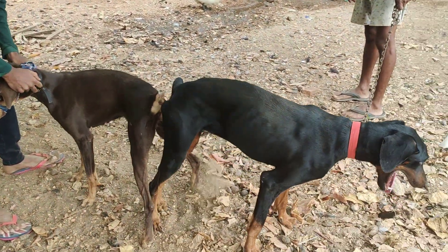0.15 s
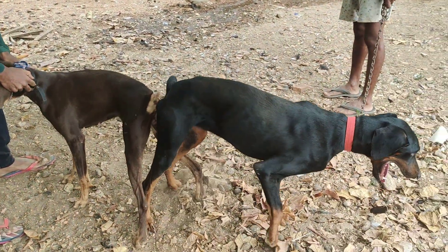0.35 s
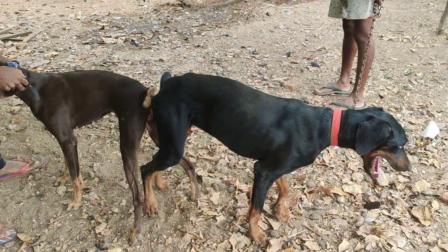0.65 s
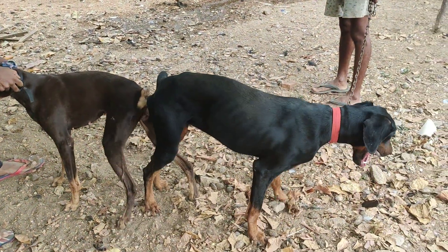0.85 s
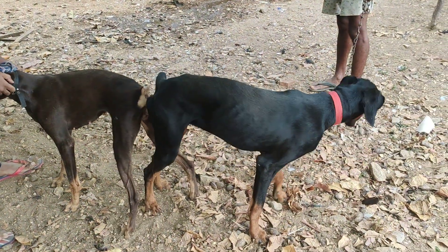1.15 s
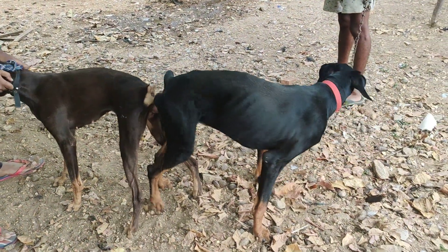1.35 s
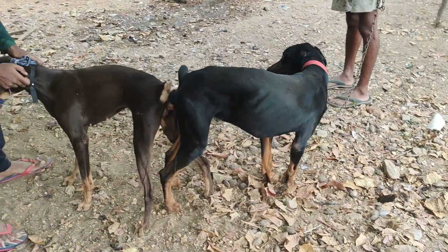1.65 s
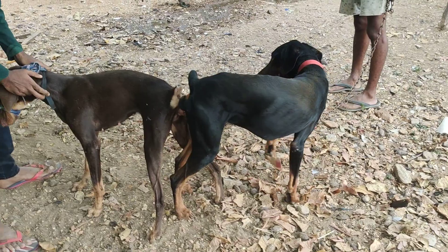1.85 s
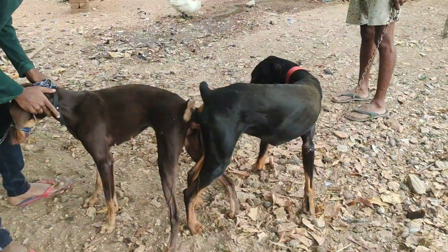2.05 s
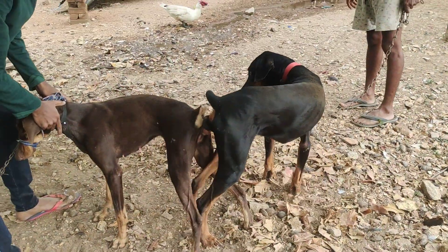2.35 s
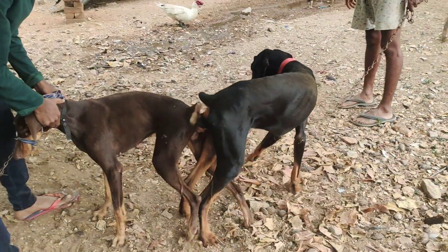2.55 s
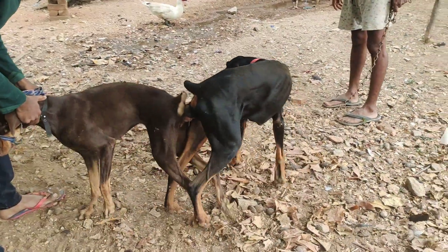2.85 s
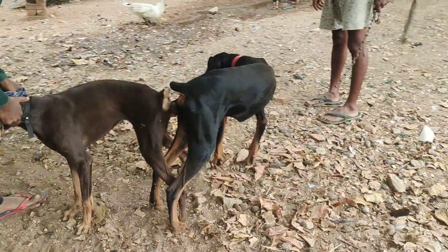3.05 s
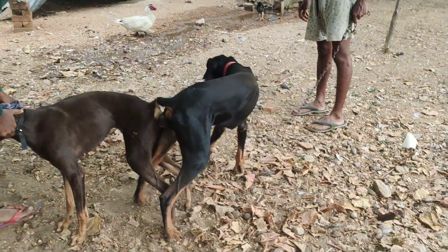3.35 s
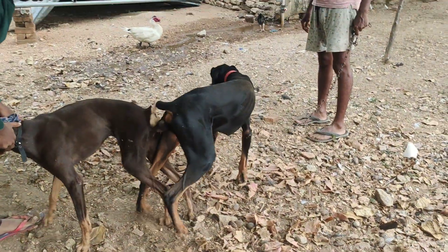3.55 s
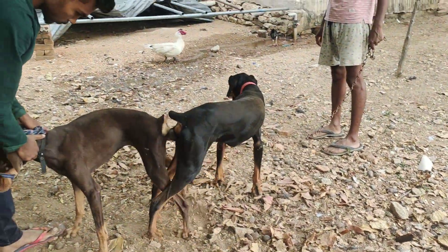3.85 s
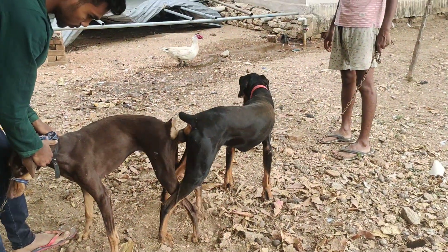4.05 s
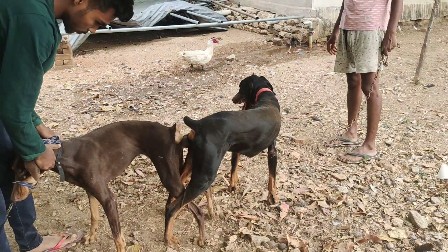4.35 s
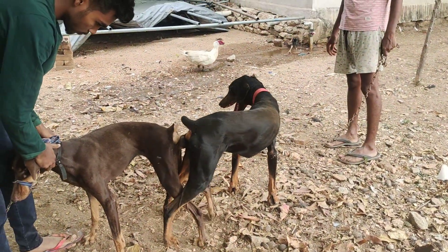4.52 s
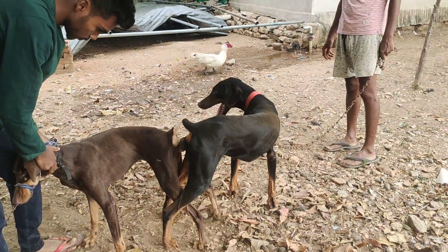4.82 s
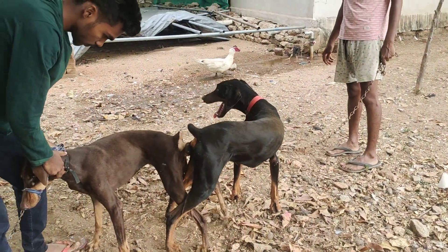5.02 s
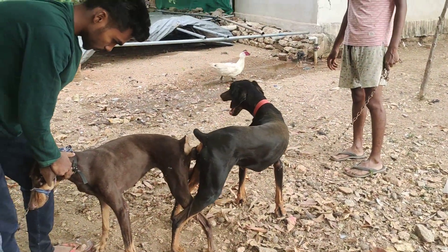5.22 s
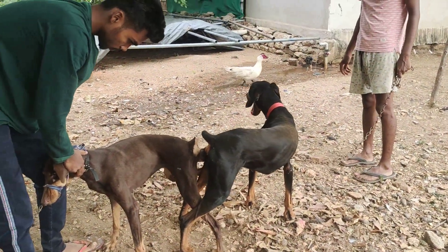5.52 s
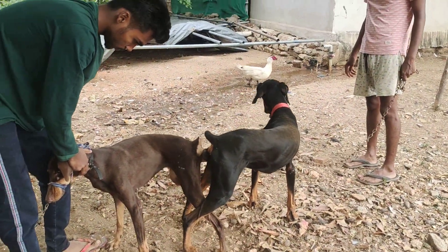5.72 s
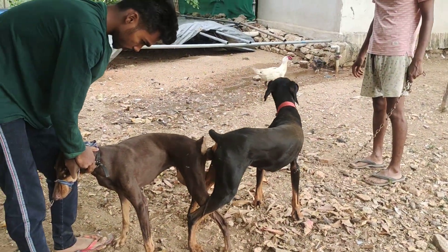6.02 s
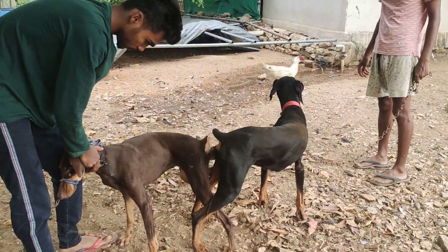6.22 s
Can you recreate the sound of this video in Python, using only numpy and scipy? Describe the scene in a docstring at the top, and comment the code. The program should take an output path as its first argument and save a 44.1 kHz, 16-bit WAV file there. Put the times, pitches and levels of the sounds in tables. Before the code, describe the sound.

Paws scuff and crunch softly in dry leaves close by from the start, with small stem snaps and dull steps on earth. At about 0.9 and 1.2 seconds a dog, slightly to the left, gives two short, sharp yelps that rise and then drop in pitch. They are much louder than everything else, and the yard walls return a quick echo. The leaf rustling continues unevenly, with crisper crunches around 2.3 and 4.4 seconds, then thins out. Chain links tick lightly between 4.1 and 5.7 seconds. The dog yelps three more times, a little softer, at about 5.1, 5.8 and 6.3 seconds, with another brief crunch at 6 seconds. Small birds give faint, high, rising chirps near 0.4, 3.6, 5.1 and 6.3 seconds, with a few fainter notes between. A quiet, low, distant hum lies underneath throughout.

```python
"""A dog off to the left yelps five times in a walled yard, and the walls throw each yelp back.
Its vocal folds give a gliding harmonic series, which the resonances of throat and mouth filter.
Close by, paws scuff and crunch dry leaves (noise from many small fractures), thud on earth and snap
stems, and chain links tick as they collide. Small birds chirp in near-sine glides over a low distant hum."""
import sys
import numpy as np
from scipy import signal
from scipy.fft import rfft, irfft, next_fast_len
from scipy.io import wavfile
from scipy.ndimage import uniform_filter1d

SR = 44100
rng = np.random.default_rng(int(sys.argv[2]) if len(sys.argv) > 2 else 0)


def wav_out(sig):
    """Save sig, one row per channel (or a flat mono array), as 16-bit PCM at SR to the path in sys.argv[1]."""
    wavfile.write(sys.argv[1], SR, np.round(np.clip(np.atleast_2d(sig).T, -1, 1) * 32767).astype(np.int16))


N = 281358

# treble spectrum of cracking leaves: f/Hz, level/dB
FIZZ_SPECTRUM = [(2500, -3), (4000, -0.5), (5500, -6.5), (6900, 4), (9000, -2), (11500, -6), (13700, 2.5),
                 (15800, -9.5)]


def dog():
    """Reflection: the direct yelps, a delayed copy from each wall, and a diffuse tail."""
    # yelps: t/s of start, mouth opening, crest and voice break; glide time/s, glide exponent,
    # start f/Hz, top f/Hz, fundamental level/dB, overtone level/dB, roughness
    yelps = [(0.891, 0.919, .985, 1.008, .095, 0.94, 355, 534.8, -14, -34.5, 0.42),
             (1.212, 1.234, 1.296, 1.32, 0.093, .9, 401.6, 527.3, -14.5, -35, 0.34),
             (5.132, 5.145, 5.198, 5.21, 0.072, 1.9, 548, 543.4, -17.5, -34.5, 0.13),
             (5.787, 5.816, 5.868, 5.906, 0.073, 1.5, 337.6, 517, -22.5, -33, 0.43),
             (6.268, 6.302, 6.357, 6.41, 0.079, 1.42, 354, 521, -19, -34, .33)]
    # wall echoes: delay/s, level/dB, right-channel lag/ms
    echoes = [(.012, -14.5, 0.19), (.036, -27, 0.15), (.079, -12, 0.31), (.108, -16.5, 0.31),
              (.136, -22.5, 0.45), (.162, -25.5, .22), (.188, -26.5, 0.5), (.208, -28.5, 0.27)]
    voice = np.zeros(N)
    for row in yelps:
        add(voice, row[0], yelp(*gesture(*row)))
    voice *= signal.windows.tukey(N, .0015)
    # rough walls scatter the treble most
    scattered = shaped(voice, lambda f: gain_of(-7) / (1 + (800 / (f + 1)) ** 2))
    left, right = reverberation(scattered, likeness=1.6)
    out = np.array([voice + left, delayed(voice + right, ms=.3)])
    for delay, db, lag_ms in echoes:
        add(out, delay, gain_of(db) * np.array([voice, delayed(voice, lag_ms)]))
    return out


def gesture(start, opens, crest, breaks, glide, bend, start_hz, top_hz, first_db, over_db, rough):
    """Vocal modulation: pitch glides, holds and sags at the break, while effort swells and fades."""
    break_s, tail_s, sag_hz, sag_hz_per_s = .008, .0437, 197, 5620
    swell, ease, shut, fall = 268, 29, 400, 438  # dB/s
    t = np.arange(start, breaks + tail_s, 1 / SR)
    before, after = np.maximum(crest - t, 0), np.maximum(t - crest, 0)
    since_break = break_s * np.log1p(np.exp((t - breaks) / break_s))
    tail = since_break / tail_s
    hz = start_hz + (top_hz - start_hz) * np.sin(np.pi / 2 * np.minimum((t - start) / glide, 1)) ** bend
    hz -= sag_hz * np.tanh(sag_hz_per_s * since_break / sag_hz)
    edge_loss = 16 * np.exp((start - t) / .0073) + fall * since_break
    effort_loss = np.where(t < crest, 3, 6) * (1 - np.exp(-((t - crest) / .015) ** 2))  # rounded crest
    effort_loss += swell * before + ease * after
    closed = 1 / (1 + np.exp((t - opens) / .003))  # the mouth snaps open
    mouth_loss = 10 * closed + shut * after
    strain = .56 + .44 * np.exp(-((t - crest) / .03) ** 2)
    rough = rough * strain + .3 * tail
    return hz, first_db - effort_loss - edge_loss, over_db - mouth_loss - edge_loss, rough, closed, tail


def yelp(hz, first_db, over_db, rough, closed, tail):
    """Source and filter: overtones and air puffs pass the throat, above a fundamental and breath."""
    # response of throat and mouth: f/Hz, level/dB
    throat = [(500, -16), (850, 8), (980, -0.5), (1090, 2.5), (1250, 1.5), (1400, -5), (1600, 3),
              (1830, -9.5), (2030, -5.5), (2280, -12.5), (2520, -15.5), (3100, -21), (3800, -26.5),
              (5500, -31.5)]
    size = len(hz)
    cycles = np.cumsum(hz) / SR
    jittered = cycles + .065 * rough * wander(size, 3)  # uneven cycles blur the high partials most
    muffle = np.clip(np.maximum((-35 - first_db) / 9, .37 * closed), 0, 1)  # low effort narrows the mouth
    soft = np.clip(1 - rough / .18, 0, 1)  # an unforced voice has few partials above the third
    folds = 0
    for k in range(2, 12):
        loss_db = 7 * muffle * (k - 2) + 11 * soft * max(k - 3, 0)
        folds += np.cos(2 * np.pi * k * jittered) * gain_of(6.8 * rough * wander(size, 2.4) - loss_db)
    puffs = 1.3 * rough * (1 - muffle) * (.2 + np.exp(-(cycles % 1) / .2)) * rng.standard_normal(size)
    overtones = shaped(gain_of(over_db) * (folds + puffs), lambda f: gain_of(read(throat, f)) * (f > 420))
    wobble_db = 3 * np.minimum(tail, 1) * wander(size, 2.5)
    fundamental = np.sin(2 * np.pi * cycles) * gain_of(wobble_db)
    air = rng.standard_normal(size)
    breath = unit_rms(shaped(air, lambda f: 1 / (1 + (5000 / (f + 1)) ** 4) / (1 + (f / 11000) ** 4)))
    voice = gain_of(first_db) * (fundamental + gain_of(-38) * breath) + overtones
    return voice * signal.windows.tukey(size, .08)


def reverberation(x, likeness):
    """Diffuse field: sparse reflections of random sign, each band decaying at its own rate."""
    # reverberation time of the yard: f/Hz, T60/s
    decay_times = [(300, 0.41), (520, 0.67), (1000, 0.41), (2000, 0.33), (5000, 0.29), (12000, 0.033)]
    taps = np.zeros((2, SR // 2))
    arrivals = np.arange(300, SR // 2 - 20, 20) + rng.integers(0, 20, (2, (SR // 2 - 301) // 20))
    np.put_along_axis(taps, arrivals, rng.choice([-1., 1.], arrivals.shape), 1)
    hz, t, bands = signal.stft(correlated(*taps, likeness), SR, nperseg=256)
    tail = signal.istft(bands * gain_of(-60 * t / read(decay_times, hz)[:, None]), SR, nperseg=256)[1]
    return signal.fftconvolve(x[None], tail / np.linalg.norm(tail[0]), axes=1)[:, :N]


def leaves():
    """Incoherent addition: scuffs and soft stirring sum in power, in three bands of grainy hiss."""
    # paw scuffs: loudest t/s, 20 dB rise time/s, 20 dB fall time/s, level/dB of earth, body and fizz
    scuffs = [(0.038, 0.013, 0.13, -53.5, -45.5, -57), (.19, 0.052, 0.26, -79, -62, -53.5),
              (.33, .02, 0.32, -60, -53.5, -46), (.508, .02, 0.06, -59, -45.5, -70),
              (.59, 0.11, 0.13, -72, -56, -52), (.778, 0.017, 0.089, -73, -58.5, -55),
              (1.0, 0.15, 0.12, -55, -43, -48), (1.49, 0.065, .2, -57.5, -52, -53),
              (1.64, 0.25, .2, -69, -51, -59), (1.7, 0.22, .1, -70, -73, -55.5),
              (1.835, 0.057, 0.088, -53.5, -45.5, -51.5), (2.05, .05, 0.066, -55.5, -42, -55),
              (2.1, 0.088, 0.77, -59.5, -54, -59.5), (2.33, 0.062, 0.076, -55, -43.5, -43.5),
              (2.39, 0.054, 0.34, -67, -54, -55.5), (2.49, 0.17, 0.053, -62, -63, -49.5),
              (2.67, .09, 0.082, -65, -57, -65), (2.79, 0.22, 0.085, -73, -58.5, -59),
              (3.015, 0.13, 0.072, -61, -48.5, -52.5), (3.12, 0.1, 0.12, -56.5, -53.5, -52.5),
              (3.345, 0.39, 0.099, -68, -57.5, -56.5), (3.47, 0.14, 0.097, -60, -58.5, -56),
              (3.64, 0.11, .15, -82, -61.5, -64), (3.79, 0.15, 0.016, -59, -60, -73),
              (3.96, 0.14, 0.086, -62, -57.5, -56.5), (4.09, 0.25, 0.43, -66, -67, -61),
              (4.244, 0.062, 0.017, -56, -52.5, -51.5), (4.28, .05, 0.071, -73, -57, -55),
              (4.33, 0.093, .04, -57, -54.5, -57), (4.4, 0.044, 0.081, -50.5, -50.5, -52),
              (4.62, .06, 0.33, -79, -67, -63.5), (4.85, 0.43, 0.055, -68, -61.5, -74),
              (6.054, 0.036, 0.093, -57, -51, -58)]
    # stirring between scuffs: t/s, level/dB of earth, body and fizz
    stirring = [(0, -65, -62.5, -64), (.45, -70, -58, -57), (.9, -71, -64.5, -76), (1.2, -60, -66, -66.5),
                (1.45, -59, -62, -68), (1.95, -70.5, -59, -70), (2.6, -77, -64.5, -61.5),
                (2.92, -63.5, -59.5, -69), (3.7, -70, -66, -66), (4.5, -72, -59.5, -75),
                (4.7, -74, -71.5, -68), (5.1, -67, -62, -70), (5.6, -67.5, -64, -72),
                (5.97, -62.5, -56, -57), (6.18, -60, -64, -70), (6.38, -74, -54, -65)]
    # spectra of scraped earth and of the leaf body: f/Hz, level/dB
    earth = [(150, -24), (300, -6), (500, 2.5), (800, 5), (1300, 1.5), (1800, -9), (3000, -58)]
    body = [(600, -51), (1300, -10), (1900, -5), (2450, -1.5), (2750, -5), (3000, -6), (4500, -9.5),
            (6000, -16.5), (8000, -19.5)]
    t = np.arange(N) / SR
    times, *stir_db = np.transpose(stirring)
    power = gain_of([np.interp(t, times, db) for db in stir_db]) ** 2
    for loudest, rise, fall, *db in scuffs:
        envelope = gain_of(-20 * np.maximum((loudest - t) / rise, (t - loudest) / fall))
        power += np.outer(gain_of(db), envelope) ** 2
    snaps_per_s = 260
    snaps = (rng.random((3, N)) < snaps_per_s / SR) * gain_of(4.1 * rng.exponential(1, (3, N)).clip(0, 5))
    snaps[::2] += .7 * snaps[1]  # many snaps sound in all bands at once
    bands = [(earth, 1.4), (body, 1.6), (FIZZ_SPECTRUM, 5)]
    out = 0
    for clicks, level, (spectrum, likeness) in zip(snaps, np.sqrt(power), bands):
        grain = 1.43 + .35 * unit_rms(signal.lfilter([1], [1, -.96], clicks))  # a snap lifts the hiss
        hiss = correlated(*grain * rng.standard_normal((2, N)), likeness)
        out += level * coloured(hiss, spectrum)
    return patchy(out, db=2.86, frames=9, bins=3)


def patchy(x, db, frames, bins):
    """Random spectral modulation: the colour changes from leaf to leaf."""
    bands = signal.stft(x, nperseg=256)[2]
    patches = uniform_filter1d(rng.standard_normal(bands.shape[-2:]), bins, axis=0)
    patches = unit_rms(uniform_filter1d(patches, frames, axis=1))
    return signal.istft(bands * gain_of(db * patches), nperseg=256)[1][..., :N]


def steps():
    """Noise-driven resonance: dying bursts make a leaf crunch or the ground thud."""
    # leaf crunches and paw falls on earth: t/s, level/dB, resonance f/Hz, T60/s
    crunches = [(0.033, -48, 2750, 0.071), (0.0544, -43, 2580, 0.03), (0.0846, -50.5, 2770, 0.038),
                (0.3203, -45.5, 3060, 0.15), (0.5032, -44, 2310, 0.059), (.5645, -52, 2150, .04),
                (.771, -54, 2880, 0.066), (1.661, -49, 2610, .045), (1.8097, -45.5, 3960, 0.22),
                (1.923, -49.5, 3300, 0.043), (2.016, -45.5, 2540, 0.11), (2.1817, -48.5, 2570, 0.06),
                (2.2977, -54, 2560, .062), (2.342, -41.5, 2680, 0.037), (2.6642, -50, 2400, 0.055),
                (3.345, -47, 2290, 0.091), (4.2352, -46, 2580, 0.021), (4.2792, -48.5, 6850, .045),
                (4.3879, -40.5, 2060, 0.21), (4.4218, -51, 2450, .045), (4.8344, -56.5, 2030, 0.073),
                (6.0004, -50, 2060, 0.047), (6.057, -43.5, 3070, .067)]
    thuds = [(.049, -51, 466, 0.29), (.321, -51, 546, 0.086), (.504, -51, 861, 0.072),
             (2.096, -43, 745, 0.042), (2.794, -50, 480, 0.11), (2.897, -50, 844, 0.13),
             (2.935, -48.5, 438, 0.12), (4.391, -47.5, 990, 0.14), (5.017, -44.5, 301, 0.034)]
    leaf_q = 1.52
    out, t = np.zeros((2, N)), np.arange(6000) / SR
    for start, db, hz, t60 in crunches:
        cracks = rng.standard_normal((2, len(t)))
        cracks *= gain_of(4 * wander(len(t), 1.2) + 6 * np.exp(-t / .003))  # the first crack is sharpest
        cracks[1] = .12 * cracks[0] + .75 * cracks[1]
        body = unit_rms(resonance(resonance(cracks, hz, hz / leaf_q), hz, .73 * hz / leaf_q))
        fizz = gain_of(-14) * coloured(cracks, FIZZ_SPECTRUM)
        add(out, start, gain_of(db - 60 * t / t60) * np.minimum(t / .00056, 1) * (body + fizz))
    for start, db, hz, t60 in thuds:
        knock = unit_rms(resonance(resonance(rng.standard_normal(len(t)), hz, 160), hz, 630))
        add(out, start, gain_of(db - 60 * t / t60) * np.minimum(t / .00084, 1) * knock)
    return out


def stems():
    """Brittle fracture: each stem breaks with a dry click in two broad bands."""
    # breaking stems: t/s, upper-band level/dB, lower band relative to upper/dB
    snaps = [(0.0552, -44.5, 5), (0.077, -45, 5), (0.3266, -43, -4), (0.5645, -43.5, 1), (1.494, -52.5, -7),
             (1.804, -54, -12), (1.8295, -46.5, 8), (2.297, -42, 5), (2.343, -38, 4), (2.5708, -40.5, -12),
             (3.016, -40, -14), (3.632, -46, -1.1), (3.9399, -50.5, -5), (4.2368, -54, -13),
             (4.2757, -44, -8), (4.3874, -57, -3), (4.4218, -45, -4), (4.6114, -49, -1),
             (4.7654, -44.5, -22), (4.831, -50, -16), (5.9466, -45, -16)]
    out, t, t60 = np.zeros((2, N)), np.arange(400) / SR, .01
    for start, db, lower_db in snaps:
        crack = rng.standard_normal((2, len(t)))
        upper = unit_rms(resonance(crack, 13000, 8400))
        lower = gain_of(lower_db) * unit_rms(resonance(crack, 5700, 2800))
        add(out, start, gain_of(db - 60 * t / t60) * (upper + lower))
    return out


def chain():
    """Free vibration: links tap each other and ring in two damped modes."""
    # impacts of links: t/s, level/dB
    ticks = [(4.0963, -47), (4.5625, -51), (5.0509, -53), (5.4311, -50), (5.451, -47), (5.541, -55),
             (5.59, -48.5), (5.6266, -49), (5.669, -49)]
    # modes of a link: f/Hz, T60/s, level/dB
    modes = [(2930, 0.032, -2.5), (3970, 0.016, -9)]
    out, t = np.zeros(N), np.arange(2000) / SR
    ring = sum(gain_of(db - 60 * t / t60) * np.sin(2 * np.pi * hz * t) for hz, t60, db in modes)
    for start, db in ticks:
        add(out, start, gain_of(db) * ring)
    return out * gain_of([[.5], [-3]])


def birds():
    """Frequency and amplitude modulation: fluttering rising chirps and faint notes of other birds."""
    # chirps: t/s, length/s, start f/Hz, top f/Hz, glide exponent, level/dB, level change/dB
    chirps = [(0.356, 0.17, 4350, 6230, 1.1, -38, -8.5), (3.632, .165, 4140, 6020, 0.9, -38.5, -6),
              (5.14, .178, 3780, 5880, .9, -41.5, 3), (6.25, 0.19, 3530, 5980, .8, -41.5, 0)]
    # contour of every chirp: share of length, share of glide, level/dB
    contour = [(0, 0, -5), (0.128, .28, 1), (.3, .47, -2), (.6, .61, -3), (0.751, .83, -3.5),
               (.85, .95, -7.5), (1, 0.82, -18)]
    # one curve a faint note: t/s, f/Hz, level/dB, relative octave level/dB, waver depth
    note_curves = [
        [(.615, 459, -54.5, -25, 0.72), (.685, 537, -63, -20, 0.64)],
        [(1.53, 1158, -59, -32, .5), (1.585, 1262, -52.5, -30, .5)],
        [(1.666, 3870, -42, -16, 0.93), (1.72, 3925, -46, -16, 0.53), (1.775, 3685, -61, -24, 0.56)],
        [(4.508, 983, -61, -46.5, 1.3), (4.57, 950, -59, -32, 1.65), (4.65, 858, -65.5, -30, 1.1)],
        [(5.284, 3650, -57, -34, 0.17), (5.335, 2640, -51.5, -30, 0.55), (5.365, 1943, -50.5, -28, 0.64),
         (5.39, 1820, -57, -62, 0.6)],
    ]
    song, notes = np.zeros(N), np.zeros(N)
    for start, length, start_hz, top_hz, bend, level_db, change_db in chirps:
        hz, db = curves([(start + length * u, start_hz + (top_hz - start_hz) * up ** bend,
                          level_db + db + change_db * u) for u, up, db in contour])
        size = len(hz)
        cycles = np.cumsum(hz * (1 + .005 * wander(size, 2.2))) / SR
        db += 3 * wander(size, 1.6)
        add(song, start, gain_of(db) * np.sin(2 * np.pi * cycles) * signal.windows.tukey(size, .1))
    for rows in note_curves:
        hz, db, octave_db, waver = curves(rows)
        start, size = rows[0][0], len(hz)
        cycles = np.cumsum(hz * (1 + .028 * waver * wander(size, 2.4))) / SR
        tone = np.sin(2 * np.pi * cycles) + gain_of(octave_db) * np.sin(4 * np.pi * cycles)
        db += 4.1 * waver * wander(size, 3.9)
        add(notes, start, gain_of(db) * tone * signal.windows.tukey(size, .25))
    direct = song + notes
    diffuse = reverberation(gain_of(-11) * song + gain_of(-10) * notes, likeness=.4)
    return np.array([direct, delayed(direct, ms=.11)]) + diffuse


def hum():
    """Ambient noise: distant rumble and air, drifting slowly in level."""
    # background spectrum: f/Hz, relative level/dB
    spectrum = [(18, -61), (30, -18), (90, 0.5), (141, 3.5), (352, -8), (903, -16.5), (1880, -19.5),
                (2440, -16), (2640, -63), (2940, -10), (3260, -37), (5220, -25), (13400, -37), (15700, -42)]
    level_db = -58 + .9 * wander(N, 120)
    air = correlated(*rng.standard_normal((2, N)), likeness=1)
    return gain_of(level_db) * coloured(air, spectrum)


def correlated(left, other, likeness):
    """Partial coherence: the right channel shares part of the left, most of all in the bass."""
    # coherence before scaling by likeness: f/Hz, coefficient
    coherence = [(60, 0.9), (200, 0.94), (600, 0.48), (1200, 0.07), (2500, 0.051), (4000, 0.011),
                 (15000, 0.017)]
    share = lambda f: np.clip(likeness * read(coherence, f), 0, 1)
    return np.array([left, shaped(left, share) + shaped(other, lambda f: np.sqrt(1 - share(f) ** 2))])


def shaped(x, response):
    """Linear filtering: multiplies the spectrum by a frequency response."""
    size = next_fast_len(x.shape[-1] + 2048)
    return irfft(rfft(x, size) * response(np.fft.rfftfreq(size, 1 / SR)), size)[..., :x.shape[-1]]


def coloured(x, spectrum):
    """Spectral weighting by a table of f/Hz, level/dB, scaled to rms 1."""
    return unit_rms(shaped(x, lambda f: gain_of(read(spectrum, f))))


def resonance(x, hz, width_hz):
    """Second-order resonance of peak gain 1."""
    return shaped(x, lambda f: 1 / (1 + 1j * (f - hz ** 2 / (f + 1)) / width_hz))


def delayed(x, ms):
    """Delay as a linear phase shift."""
    return shaped(x, lambda f: np.exp(-2j * np.pi * f * ms / 1000))


def wander(size, ms):
    """Low-pass noise of rms 1, smoothed over ms."""
    width = max(round(ms * SR / 1000), 1)
    return unit_rms(uniform_filter1d(uniform_filter1d(rng.standard_normal(size), width), width))


def read(points, hz):
    """Linear interpolation over log frequency."""
    f, value = np.transpose(points)
    return np.interp(np.log(hz + 1), np.log(f + 1), value)


def curves(rows):
    """Linear interpolation over time: the columns after t/s at every sample."""
    times, *columns = np.transpose(rows)
    t = np.arange(times[0], times[-1], 1 / SR)
    return [np.interp(t, times, column) for column in columns]


def add(mix, start, sound):
    """Superposes a sound at start seconds."""
    part = mix[..., round(start * SR):][..., :sound.shape[-1]]
    part += sound[..., :part.shape[-1]]


def gain_of(db):
    """Level to amplitude ratio."""
    return 10 ** (np.asarray(db) / 20)


def unit_rms(x):
    """Normalises to rms 1."""
    return x / np.sqrt(np.mean(x ** 2) + 1e-20)


def scene():
    """Superposition of all sources in two channels."""
    return dog() + birds() + leaves() + steps() + stems() + chain() + hum()


def record(dry):
    """Frequency response: each channel has its own colour, between a bass cut and a band limit."""
    # channel balance: f/Hz, level of left over right/dB
    balance = [(60, -3.5), (110, -0.5), (200, 2), (380, -0.5), (700, -1), (1290, 2), (2380, 7), (4400, 2.5),
               (8120, -1), (15000, 5.5)]
    bass_cut_hz, limit_hz = 52, 15700
    faded = dry * signal.windows.tukey(N, .0015)
    colour = lambda f: gain_of(np.outer([.5, -.5], read(balance, f)))
    channels = shaped(faded, lambda f: colour(f) / (1 + (bass_cut_hz / (f + 1)) ** 3))
    low_pass = signal.firwin(1023, limit_hz, window=("kaiser", 9), fs=SR)
    return signal.oaconvolve(channels, low_pass[None], "same")


dry = scene()
out = record(dry)
wav_out(out)
```